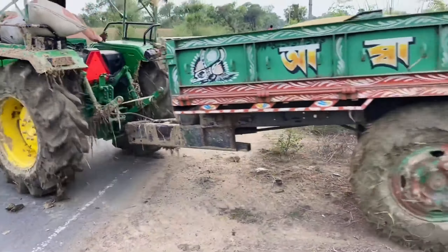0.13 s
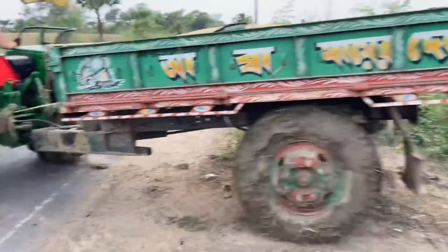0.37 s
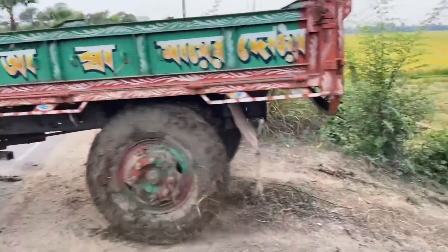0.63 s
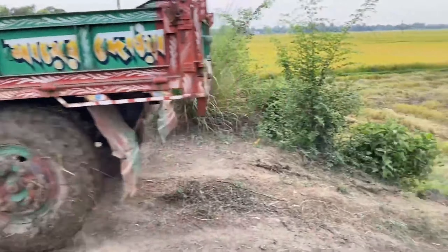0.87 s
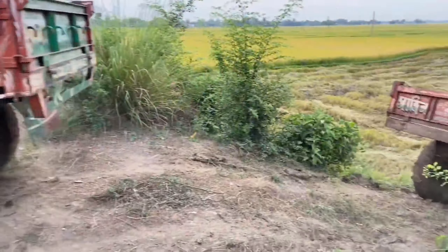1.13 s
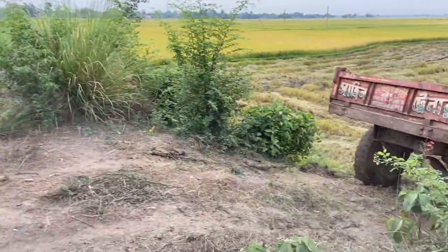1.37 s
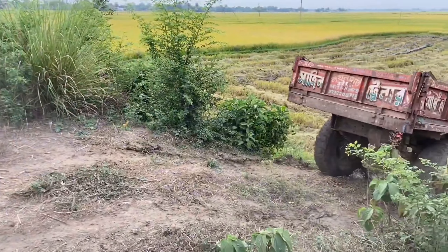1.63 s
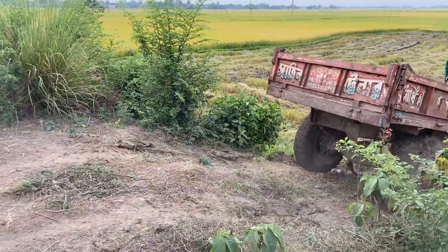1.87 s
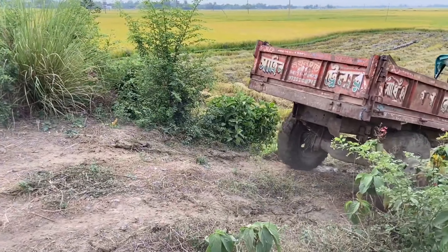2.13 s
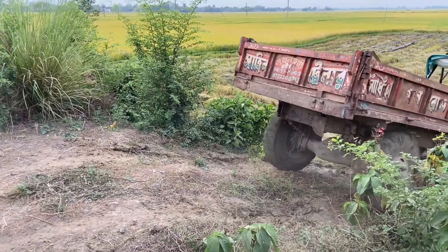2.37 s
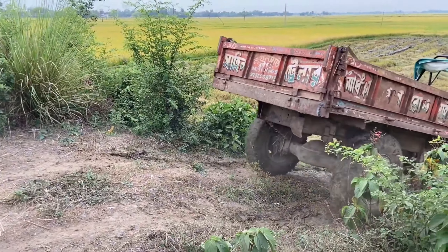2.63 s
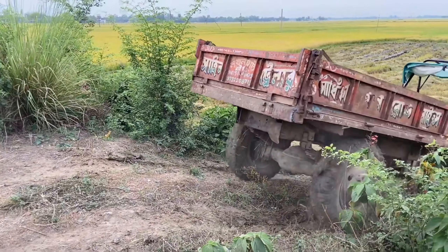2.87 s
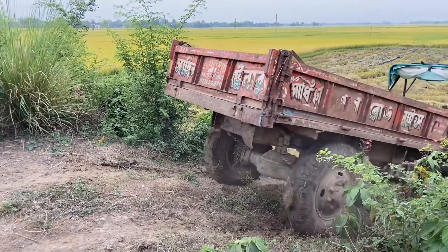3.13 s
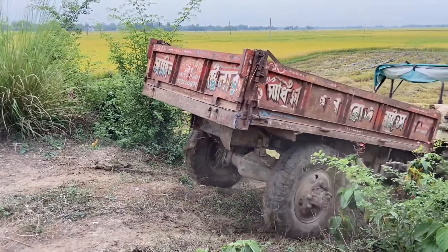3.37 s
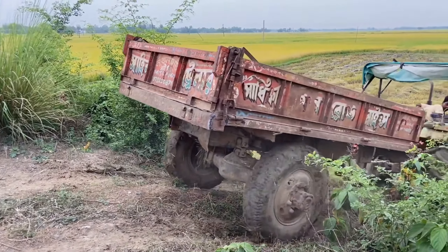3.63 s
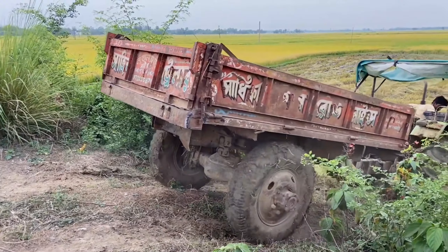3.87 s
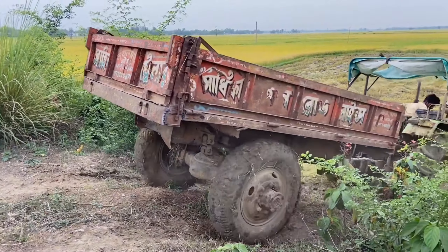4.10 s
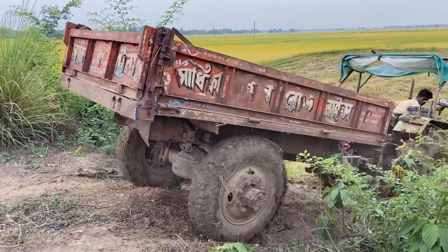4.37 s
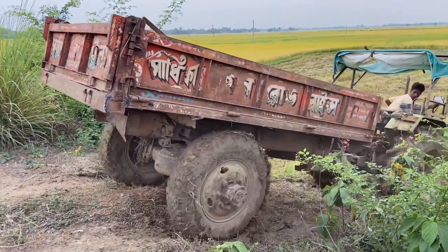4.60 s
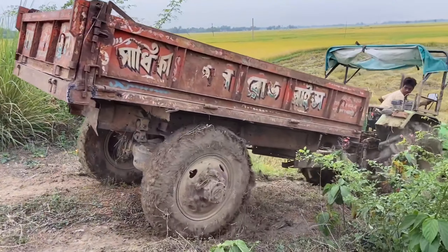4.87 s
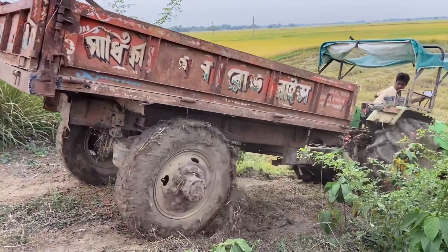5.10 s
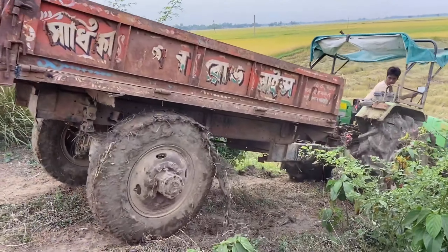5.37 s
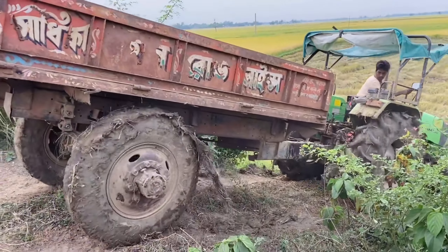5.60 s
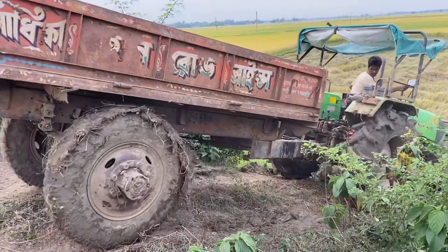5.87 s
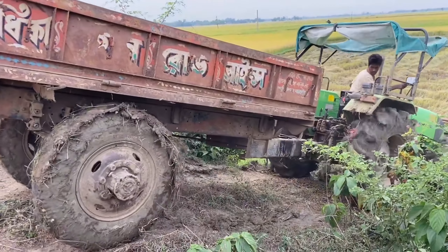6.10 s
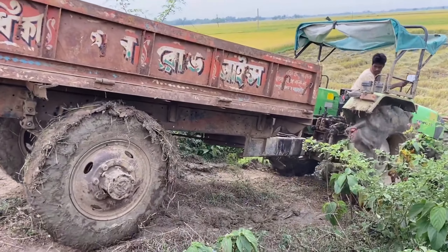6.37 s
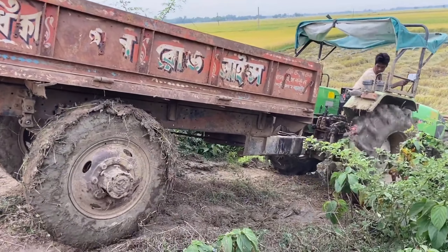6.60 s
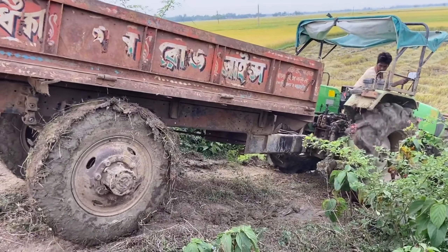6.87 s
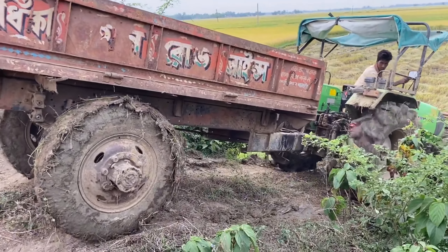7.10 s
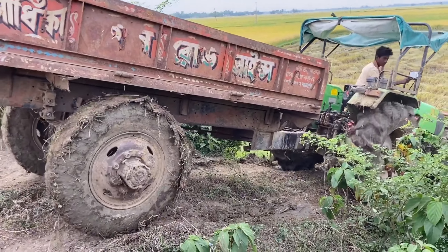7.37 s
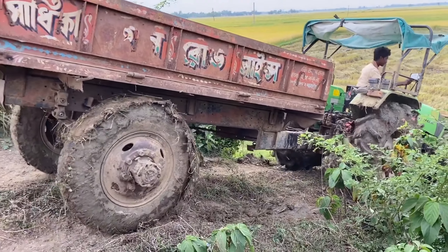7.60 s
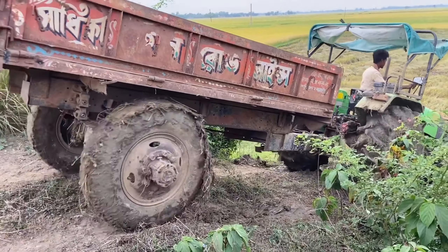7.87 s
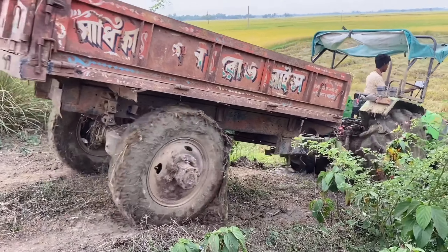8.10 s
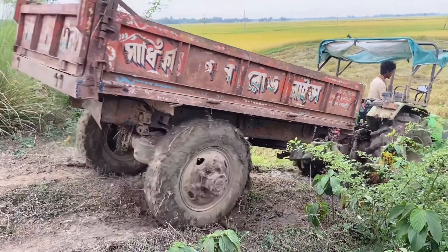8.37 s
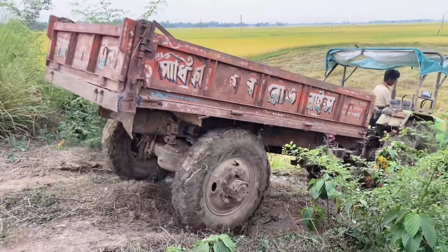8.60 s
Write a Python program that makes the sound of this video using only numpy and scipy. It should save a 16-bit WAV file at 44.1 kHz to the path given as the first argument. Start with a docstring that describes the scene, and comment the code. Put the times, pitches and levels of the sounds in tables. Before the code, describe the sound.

Two heavy diesel engines throb close by in open farmland with no room echo. The nearer one climbs quickly to a hard, loaded roar, its gears whining and block clattering, while the other holds and then slows. Early on come a thin whistle, trailer knocks and short metallic squeals. Late, the load lifts, whine slackens, pitch sinks, and loose metal rattles again, picked up in close stereo.

```python
"""Two three-cylinder diesel tractors in an open field, heard a few metres away through a small two-port microphone.
From the start one waits at steady revs while the other revs up to haul a trailer out of the mud: their exhausts,
sums of tones locked to the engine cycle, beat. Gear tones whine, a rung engine block knocks, filtered noise rushes;
jolts rattle, a resonant whistle swells and steel squeaks. After five seconds the waiting tractor throttles down;
at seven the hauling driver lifts off, the gear whine slackens and the firing turns uneven; last jolts follow."""
import sys
import numpy as np
from scipy import signal
from scipy.fft import rfft, irfft, next_fast_len
from scipy.io import wavfile

SR = 44100
rng = np.random.default_rng(int(sys.argv[2]) if len(sys.argv) > 2 else 0)


def digitize_waveform(pressure):
    """Quantize a signal to 16-bit integers and store it at the path in sys.argv[1].

    Rows of a 2-D input are taken as channels; values are limited to [-1, 1].
    """
    field = np.atleast_2d(pressure).T
    bounded = np.clip(field, -1, 1)
    quanta = np.round(bounded * 32767).astype(np.int16)
    wavfile.write(sys.argv[1], SR, quanta)


def ratio(d):
    """dB to gain"""
    e = np.asarray(d, float) / 20
    return 10 ** e


N = 384993
TIME = np.arange(N) / SR


def rms_one(x):
    """Scale to rms 1."""
    return x / np.sqrt(np.mean(x ** 2) + 1e-20)


def in_time(rows):
    """Columns of an automation curve, sample by sample."""
    s, *columns = np.transpose(rows)
    return [np.interp(TIME, s, column) for column in columns]


def at_hz(points, hz):
    """Read a spectrum on a log-frequency axis."""
    point_hz, value = np.transpose(points)
    return np.interp(np.log(hz), np.log(point_hz), value)


def drift(rate_hz):
    """Slow random wander of spread 1: noise through two equal low-pass poles, drawn at every 40th sample."""
    r = np.exp(-80 * np.pi * rate_hz / SR)
    settle = 2000
    noise = rng.standard_normal(N // 40 + 2 + settle)
    slow = signal.lfilter([1], [1, -2 * r, r * r], noise)[settle:]
    return np.interp(np.arange(N) / 40, np.arange(len(slow)), rms_one(slow))


def resonate(x, modes):
    """Parallel resonances with alternating signs."""
    out = 0
    for k, (hz, width, db) in enumerate(modes):
        r = np.exp(-np.pi * width / SR)
        poles = [1, -2 * r * np.cos(2 * np.pi * hz / SR), r * r]
        ringing = signal.lfilter([(1 - r * r) / 2, 0, (r * r - 1) / 2], poles, x)
        out = out + (-1) ** k * ratio(db) * ringing
    return out


def burst(start, length, rise):
    """Sample range, progress and envelope of a short event; its fade-out takes another half length."""
    i = slice(max(int(start * SR), 0), min(int((start + 1.5 * length) * SR), N))
    u = (TIME[i] - start) / length
    return i, u, np.clip(u / rise, 0, 1) * np.clip(3 - 2 * u, 0, 1) ** 2


def delayed(x, lag_s, db):
    """One later copy at another level: a bounce off the soil or a longer way to a port."""
    return np.interp(TIME - lag_s, TIME, x) * ratio(db)


# main exhaust tones: the firing tone, its octave, its third tone, and one at four per cycle
# (tones per engine cycle of three firings)
MAIN_ORDERS = (3, 6, 9, 4)
# minor exhaust tones before tilt and waver: (order [tones per cycle],
# waiting level against the firing tone [dB], hauling level against the firing tone [dB])
MINOR_TONES = [(4, -29, -43), (5, -38, -17), (7, -23, -17.5), (8, -25, -18), (10, -17.5, -18),
               (11, -26, -24), (12, -20.5, -17.5), (13, -29, -23), (15, -29, -22), (16, -22, -26),
               (17, -31, -19.5), (18, -43, -23.5), (21, -23.5, -25.5), (23, -32, -23.5), (14, -27.5, -24.5),
               (20, -28, -28), (24, -35, -23.5), (27, -26, -32.5), (30, -38, -25.5)]


def exhaust(speed, main_db, crank, pipe, column, waver_db, dull_db):
    """Steady firing gives tones at whole multiples of the cycle; returns the sound and the cycle count."""
    firings_per_s = in_time(speed)[0]
    cycles = crank + np.cumsum(firings_per_s) / SR / 3
    out = 0
    for order, db, lead in zip(MAIN_ORDERS, main_db, pipe):
        out = out + ratio(db) * np.cos(2 * np.pi * (order * cycles + lead))
    for row in MINOR_TONES:  # cylinders differ from cycle to cycle, so these tones waver
        order = int(round(row[0]))
        tilt_db = -dull_db * (row[0] - 15.5)  # dull_db is per step of order
        level = ratio(main_db[0] + row[column] + tilt_db + waver_db * drift(3.4))
        out += level * np.cos(2 * np.pi * (order * cycles + rng.random()))
    return np.sqrt(2) * out, cycles


# waiting engine speed: (time [s], speed [firings per s])
WAITING_SPEED = [(0, 54.98), (.4, 54.66), (1.6, 55.13), (4.4, 54.85), (5.5, 54.89), (6.05, 48.87),
                 (7.25, 38.36), (7.5, 35.45), (8.73, 27.91)]
# waiting exhaust: (time [s], firing tone level [dB], bark = octave against the firing tone [dB])
WAITING_LEVELS = [(0, -28.5, 0.5), (.3, -25, -2.5), (1.5, -27, -9.5), (2.1, -25.5, -17), (2.6, -26.5, -20),
                  (5.2, -29, -9), (5.6, -27, -15), (6.1, -27, -3), (6.9, -41, 1), (8.73, -59, 0)]
# lead the waiting exhaust pipe gives each main tone: (lead [turns])
WAITING_PIPE = (0, .05, -.08)
# centres of the third tone's dips: (time [s])
THIRD_DIPS = [.25, 2.1, 5.55, 7.1]


def waiting_exhaust():
    """Three main tones and the minor ones follow the waiting engine; its third tone drops out at set times."""
    third_db, dip_half_length_s, dip_depth_db = -3, 0.29, 14
    firing_db, bark_db = in_time(WAITING_LEVELS)
    dips = sum(np.clip(1 - abs(TIME - s) / dip_half_length_s, 0, 1) for s in THIRD_DIPS)
    tones_db = firing_db, firing_db + bark_db, firing_db + third_db - dip_depth_db * dips
    start_cycles = -.09
    sound, _ = exhaust(WAITING_SPEED, tones_db, start_cycles, WAITING_PIPE,
                       column=1, waver_db=4.5, dull_db=-0.5)
    return sound


# hauling tractor: (time [s], firing tone level [dB], nearness [dB], bark = octave against the firing tone [dB])
HAULING_LEVELS = [(0, -47, -10, 0), (.6, -42, -22, -0.5), (1.3, -23.5, -9.5, 0), (2, -25, -9.5, 1.5),
                  (2.9, -20.5, -7, -1.5), (3.6, -21, -5.5, -3.5), (4.2, -20.5, -5, -8.5),
                  (5.3, -20.5, -0.5, -2.5), (5.8, -21, 0.5, 0.1), (6.3, -20, 0.5, .4), (6.7, -17, 1, -1.9),
                  (7.15, -19.5, 0.5, 0.6), (7.9, -20, -2, -5), (8.3, -23, -3.5, -4.5),
                  (8.73, -26.5, -3, -8.5)]
# layers of the hauling tractor by name: (gain at zero nearness and bark [dB], nearness share [dB per dB],
# bark share [dB per dB], loss at lift-off [dB])
HAULING_LAYERS = {"third": (-27, 1.4, 0.06, -0.8), "four per cycle": (-24.5, 1.4, 2.8, -6),
                  "mesh": (-29, 1.2, 0.5, .1), "mesh octave": (-35.5, 0.7, 0.54, -1),
                  "knock": (-31, 1.53, -0.54, 14), "timing": (-35.5, 1, -0.8, 8.5),
                  "rumble": (-23, 0.8, -0.05, 3), "clatter": (-31, 0.67, -0.04, 5.5),
                  "hiss": (-42, 0.98, -0.22, 6.5), "pump": (-41.5, 0.5, 0.2, 9)}


def hauling_levels():
    """Firing level, bark, lift-off (0 to 1) and layer gains; the pull leaves the gear teeth after lift-off."""
    firing_db, near_db, bark_db = in_time(HAULING_LEVELS)
    lift_off_s, lift_takes_s = 7.11, 0.67
    lifted = np.clip((TIME - lift_off_s) / lift_takes_s, 0, 1)
    layer_db = {}
    for name, (db, near, bark, loss) in HAULING_LAYERS.items():
        layer_db[name] = db + near * near_db + bark * bark_db - loss * lifted
    slack_s, slack_takes_s, slack_db = 7.22, 0.12, -7.5
    slack = slack_db * np.clip((TIME - slack_s) / slack_takes_s, 0, 1)
    for name in ("mesh", "mesh octave"):
        layer_db[name] = layer_db[name] + slack
    return firing_db, bark_db, lifted, layer_db


# hauling engine speed: (time [s], speed [firings per s])
HAULING_SPEED = [(0, 38.15), (.85, 53.51), (1.2, 59.08), (1.45, 60.63), (2.4, 59.37), (3.1, 61.27),
                 (4.1, 58.99), (4.7, 60.21), (5.35, 60.21), (6.2, 61.99), (6.6, 61.42), (7.17, 60.96),
                 (7.45, 55.94), (7.9, 49.99), (8.5, 42.62), (8.73, 40.58)]
# lead the hauling exhaust pipe gives each main tone: (lead [turns])
HAULING_PIPE = (0, .4, .33, -.06)


def hauling_exhaust(firing_db, bark_db, lifted, layer_db):
    """Four main tones and the minor ones; at lift-off these waver more and tilt away from the high orders."""
    tones_db = firing_db, firing_db + bark_db, layer_db["third"], layer_db["four per cycle"]
    start_cycles = -.113
    return exhaust(HAULING_SPEED, tones_db, start_cycles, HAULING_PIPE,
                   column=2, waver_db=2.0 + 2.9 * lifted, dull_db=0.19 * lifted)


def gears(cycles, tone_db, octave_db):
    """Tooth mesh tone and its octave; the level of each wanders at random, several times a second."""
    meshes_per_cycle = 15.27
    mesh = 2 * np.pi * meshes_per_cycle * cycles + .5 * drift(2.1)
    tone = ratio(tone_db + 1.34 * drift(12.5)) * np.sin(mesh)
    octave = ratio(octave_db + 1.94 * drift(9.7)) * np.sin(2 * mesh)
    return np.sqrt(2) * (tone + octave)


# engine block resonances: (frequency [Hz], width [Hz], level [dB])
BLOCK_MODES = [(1240, 176, 0), (1040, 61, 1.5), (1478, 53, -0.5), (2274, 160, -7.5)]
# valve and injector blows: (place in the cycle [0-1], mean level [dB])
STROKES = [(0.022, -16), (0.297, -5), (.4, 3), (0.679, -10)]


def block_knock(cycles):
    """The same blows, slightly uneven, return every cycle and ring the engine block along with some noise."""
    blows = 0.058 * rng.standard_normal(N)
    for place, db in STROKES:
        at = np.flatnonzero(np.diff(np.floor(cycles - place)))
        blows[at] += ratio(db + rng.normal(0, 0.93, len(at)))
    return rms_one(resonate(blows, BLOCK_MODES))


def timing_gear(cycles):
    """A faster mesh, loaded in one short push a cycle and slightly unsteady."""
    meshes_per_cycle = 58
    push = rms_one(np.exp(np.cos(2 * np.pi * cycles)))
    tone = np.sin(2 * np.pi * meshes_per_cycle * cycles + 0.73 * drift(2.2))
    return push * ratio(0.84 * drift(13)) * tone


def pump_whine(cycles):
    """A thin unsteady whine locked to the cycle, perhaps the pump drive."""
    meshes_per_cycle = 74
    tone = np.sin(2 * np.pi * meshes_per_cycle * cycles + 0.71 * drift(5))
    return ratio(3.5 * drift(6)) * tone


# layers of the waiting tractor by name: (level at the start [dB], loss [dB per s])
TURNING_AWAY = {"panels": (-28, 16), "rumble": (-26, 4), "clatter": (-31, 7.3), "hiss": (-44, 5.8)}


def fading(name):
    """Level of a layer of the waiting tractor as the microphone turns away from it."""
    db, loss_db_s = TURNING_AWAY[name]
    return db - loss_db_s * TIME


def both_tractors(name, hauling_db):
    """Gain of a noise layer: the powers of the two tractors add."""
    return np.hypot(ratio(hauling_db), ratio(fading(name)))


# likeness of the noise at the two ports: (frequency [Hz], left-right likeness [0-1])
LIKENESS = [(60, 0.69), (250, 0.98), (950, 0.41), (3800, 0.6), (8000, 0.75), (15000, 1)]


def field_noise(spectrum, patchy_db):
    """Stereo noise in 0.4-octave bands that flicker partly together; part of it is unlike at the two ports."""
    octaves = np.log2(spectrum[-1][0] / spectrum[0][0])
    edges = spectrum[0][0] * 2 ** np.arange(0, octaves + .01, .4)
    white = rng.standard_normal((2, 2, N))
    together = drift(9.4)
    out = 0
    for k, (low, high) in enumerate(zip(edges, edges[1:])):
        band = signal.butter(2, [low, high], "band", fs=SR, output="sos")
        same, other = signal.sosfilt(band, white[k % 2])
        hz = np.sqrt(low * high)
        alike = np.clip(at_hz(LIKENESS, hz), 0, 1)
        gain = ratio(at_hz(spectrum, hz) + patchy_db * (0.48 * together + drift(15)))
        out = out + gain * (np.sqrt(1 + alike) * same + np.sqrt(1 - alike) * other * [[1], [-1]])
    return rms_one(out)


# rumble spectrum: (frequency [Hz], relative density [dB per Hz])
RUMBLE = [(35, -16), (60, 0.5), (110, -2), (230, -7), (400, -8.5), (700, -14.5), (1000, -11.5), (1600, -35)]


def rumble(hauling_db):
    """Low noise of both tractors."""
    return both_tractors("rumble", hauling_db) * field_noise(RUMBLE, patchy_db=1.78)


# clatter spectrum: (frequency [Hz], relative density [dB per Hz])
CLATTER = [(500, -37), (900, -10.5), (1400, 3.5), (1650, -4), (2400, -3.5), (3200, -11), (5000, -10.5),
           (6500, -70)]


def clatter(hauling_db, cycles):
    """Middle noise of both tractors, puffing with each firing of the hauling one."""
    puffs = 1 + 0.065 * np.cos(2 * np.pi * 3 * cycles)
    return both_tractors("clatter", hauling_db) * puffs * field_noise(CLATTER, patchy_db=1.22)


# hiss spectrum: (frequency [Hz], relative density [dB per Hz])
HISS = [(3500, -5), (5500, 0), (8000, -2), (10500, -9), (12500, -6), (15000, -10), (16500, -25)]


def hiss(hauling_db):
    """Treble noise of both tractors."""
    return both_tractors("hiss", hauling_db) * field_noise(HISS, patchy_db=1.75)


# hum of the waiting tractor, two narrow gear lines and panel resonances: (frequency [Hz], width [Hz], level
# [dB])
HUM_MODES = [(451.6, 6.1, 9.5), (896, 12, 4), (1860, 20, -2.5), (3510, 21, -0.5), (2960, 360, -18)]


def waiting_hum():
    """Noise rings the gear lines and panels of the waiting tractor; the hum only fades."""
    return ratio(fading("panels")) * rms_one(resonate(rng.standard_normal(N), HUM_MODES))


# whistle resonances: (frequency [Hz], width [Hz], level [dB])
WHISTLE_MODES = [(2666, 190, 7), (2620, 34, 3), (3550, 65, -6.5), (1870, 21, -18.5)]
# whistle contour: (rise [dB per s], top level [dB], fall [dB per s])
WHISTLE_SWELL = (39, -37.5, 13)
# whistle at its top: (from [s], until [s])
WHISTLE_HELD = (.45, 1.3)


def waiting_whistle():
    """Resonant noise swells, holds and fades as the engine side of the waiting tractor comes round."""
    rise_db_s, top_db, fall_db_s = WHISTLE_SWELL
    top_s, hold_s = WHISTLE_HELD
    swell_db = -rise_db_s * np.maximum(top_s - TIME, 0)
    fade_db = -fall_db_s * np.maximum(TIME - hold_s, 0)
    return ratio(top_db + swell_db + fade_db) * rms_one(resonate(rng.standard_normal(N), WHISTLE_MODES))


# jolts of trailer and hitch, each a short rattle:
# (time [s], length [s], centre [Hz], spread [octaves], level before the envelope [dB])
JOLTS = [(0, 0.1, 920, 1.7, -26.5), (.42, 0.018, 640, 0.23, -21.5), (.421, 0.027, 1350, 0.069, -23.5),
         (1.617, 0.036, 7700, 0.16, -45), (1.695, 0.021, 1890, 1.23, -21.5), (1.689, 0.054, 600, 1.6, -23),
         (2.772, 0.027, 1790, 0.83, -34), (3.238, 0.044, 1890, 1.2, -31.5),
         (1.693, 0.018, 4760, 0.13, -28.5), (3.045, .035, 1920, 0.73, -28.5), (3.048, 0.032, 695, 1.2, -29),
         (3.176, 0.058, 1680, 0.48, -33), (3.37, .025, 1700, .6, -35), (3.935, .03, 1700, .6, -33),
         (3.456, .005, 11000, 1.6, -36), (3.52, .004, 10000, 1.4, -38), (5.554, 0.14, 4100, 0.38, -37.5),
         (5.737, 0.048, 4500, 0.46, -29.5), (8.097, 0.05, 2250, .3, -36), (8.101, 0.081, 4830, 0.7, -40.5),
         (8.153, 0.036, 2160, 0.33, -34.5), (8.448, 0.11, 1570, 0.39, -29.5), (8.45, 0.072, 700, 1.1, -33),
         (8.446, 0.093, 4430, 0.41, -39.5), (8.585, 0.032, 4200, 0.77, -35.5),
         (8.62, 0.061, 1940, 0.55, -36), (8.691, 0.076, 1730, 0.49, -32.5)]


def jolts():
    """Dense uneven clicks through a band of panel modes, dying away."""
    out = np.zeros(N)
    clicks = rng.standard_normal(N) * ratio(5.0 * np.minimum(rng.exponential(1, N), 4))
    for start, length, hz, octaves, db in JOLTS:
        i, u, shape = burst(start, length, rise=0.13)
        edges = hz * 2 ** (np.array([-.5, .5]) * max(octaves, .05))
        edges = np.clip(edges, 20, .45 * SR)
        band = signal.butter(2, edges, "band", fs=SR, output="sos")
        rattle = rms_one(signal.sosfilt(band, clicks[i]))
        out[i] += ratio(db - 7.7 * u) * shape * rattle
    return out


# steel rubbing on steel: (time [s], length before the fade-out [s], pitch at the start [Hz],
# pitch after that length [Hz], fundamental level before envelope and wander [dB])
SQUEAKS = [(.655, .022, 7750, 7700, -42), (.668, .022, 1840, 1815, -29), (.695, .055, 1760, 1680, -39),
           (1.495, .05, 10450, 10200, -47), (1.615, .025, 6750, 6650, -46), (1.663, .05, 1710, 1705, -27),
           (1.698, .042, 2555, 2535, -27.5), (1.788, .04, 2700, 2920, -32),
           (1.795, .032, 10400, 10400, -48), (1.92, .045, 7700, 7550, -41)]


def squeaks():
    """Stick-slip holds one mode as an unsteady tone with two overtones."""
    out = np.zeros(N)
    pitch_wander, level_wander = drift(82), drift(140)
    for start, length, hz0, hz1, db in SQUEAKS:
        i, u, shape = burst(start, length, rise=0.16)
        hz = (hz0 + (hz1 - hz0) * u) * (1 + .005 * pitch_wander[i])
        phase = 2 * np.pi * np.cumsum(hz) / SR
        tone = np.sin(phase) + ratio(-19.5) * np.sin(2 * phase) + ratio(-26) * np.sin(3 * phase)
        out[i] += np.sqrt(2) * ratio(db + 2.8 * level_wander[i]) * shape * tone
    return out


# left-right phase of the tractor mix, stepped in the treble: (frequency [Hz], left ahead of right [rad])
STEREO_PHASE = [(0, 0), (1210, -0.9), (1640, -2.2), (3270, 1.5), (4220, 0.3), (7060, 0.0), (8350, -2.8),
                (9560, -3.3), (10400, -6.1), (11600, -6.3), (12500, -9.3), (13900, -9.5), (14600, -12.5),
                (16300, -12.6)]
# left-right level of the tractor mix: (frequency [Hz], left minus right [dB])
STEREO_TILT = [(60, -0.5), (240, 0.5), (950, -1.5), (3770, 1), (15000, -0.5)]


def turn_stereo(left, right):
    """Turn left against right in phase and level, by frequency."""
    size = next_fast_len(N)
    hz = np.arange(1, size // 2 + 2) * SR / size
    phase = np.interp(hz, *np.transpose(STEREO_PHASE))
    turn = ratio(at_hz(STEREO_TILT, hz) / 2) * np.exp(.5j * phase)  # half to each side, opposite ways
    turned_left = irfft(rfft(left, size) * turn, size)[:N]
    turned_right = irfft(rfft(right, size) / turn, size)[:N]
    return np.array([turned_left, turned_right])


def scene():
    """Both tractors, their noise and the steelwork at the two ports."""
    waiting = waiting_exhaust()
    firing_db, bark_db, lifted, db = hauling_levels()
    hauling, cycles = hauling_exhaust(firing_db, bark_db, lifted, db)
    metal = gears(cycles, db["mesh"], db["mesh octave"])
    metal += ratio(db["knock"]) * block_knock(cycles)
    metal += ratio(db["timing"]) * timing_gear(cycles)
    metal += ratio(db["pump"]) * pump_whine(cycles)
    noise = rumble(db["rumble"]) + clatter(db["clatter"], cycles) + hiss(db["hiss"])
    whistle = waiting_hum() + waiting_whistle()
    # the waiting exhaust stands to one side and reaches the right port a little later
    left = hauling + waiting + whistle + metal + delayed(metal, 0.00289, -24.5)
    right = hauling + delayed(waiting, 0.00079, 0) + delayed(whistle, .00006, -1.3)
    right += metal + delayed(metal, 0.00421, -11.5)
    steel = jolts() + squeaks()  # the trailer is straight ahead: both ports hear it at once
    trailer = np.array([steel, steel + delayed(steel, .0034, -4.5)])  # a bounce reaches the right port
    return turn_stereo(left + noise[0], right + noise[1]) + trailer


def top_cut(x):
    """Nothing passes above the cut-off."""
    return signal.sosfilt(signal.butter(12, 16680, fs=SR, output="sos"), x)


def record(dry):
    """Deliver the finished mix."""
    return top_cut(dry)


dry = scene()
out = record(dry)
digitize_waveform(out)
```